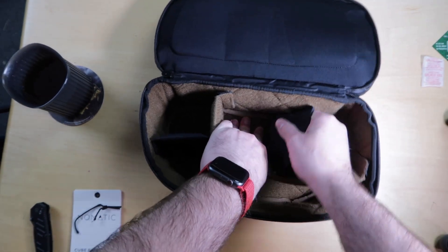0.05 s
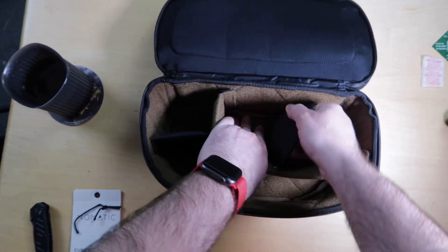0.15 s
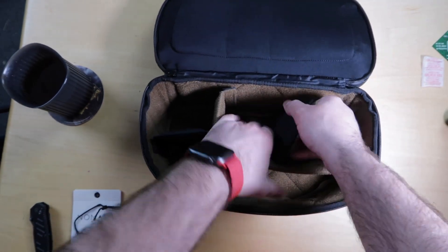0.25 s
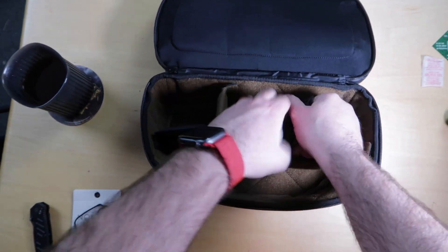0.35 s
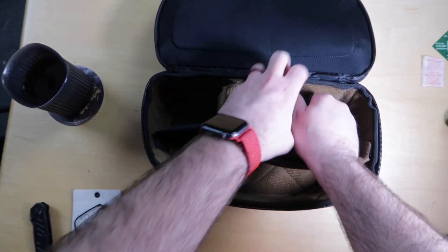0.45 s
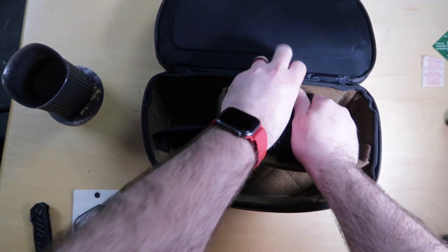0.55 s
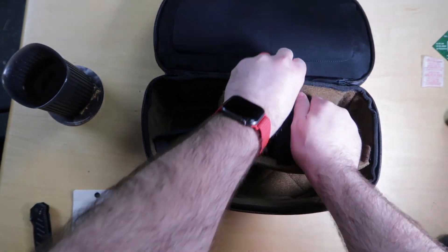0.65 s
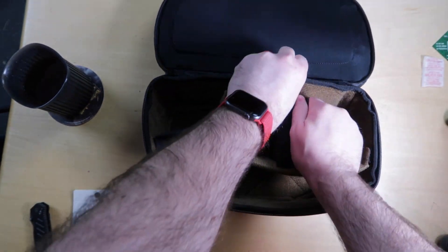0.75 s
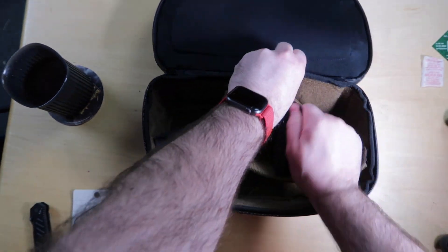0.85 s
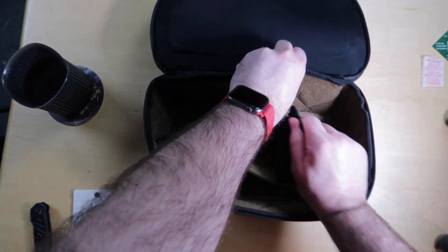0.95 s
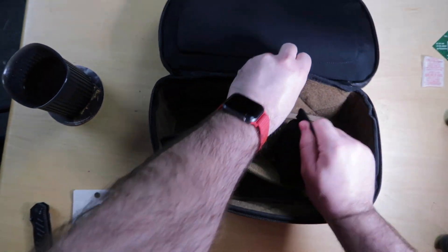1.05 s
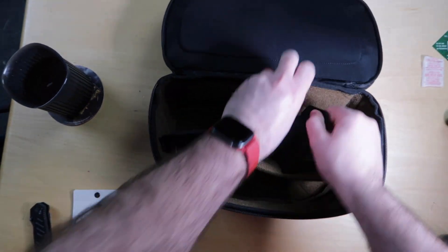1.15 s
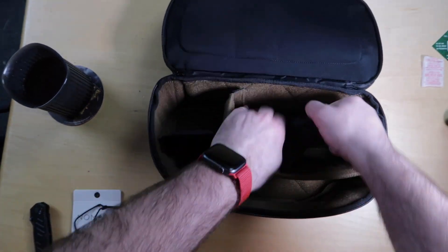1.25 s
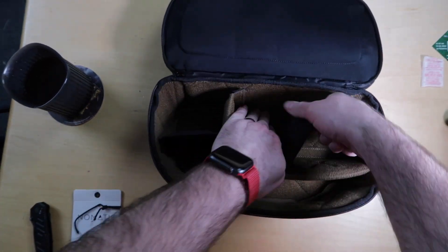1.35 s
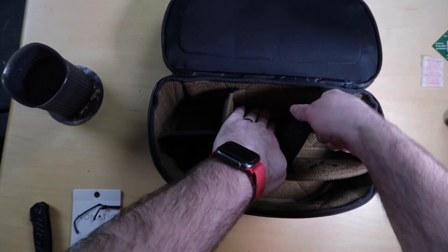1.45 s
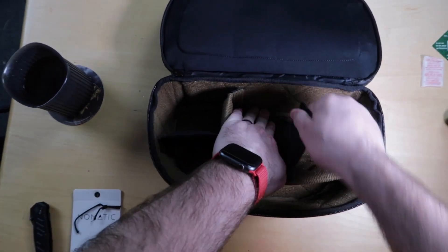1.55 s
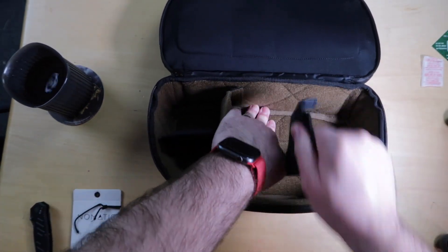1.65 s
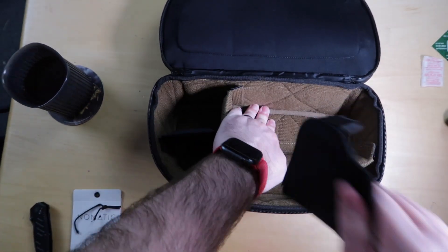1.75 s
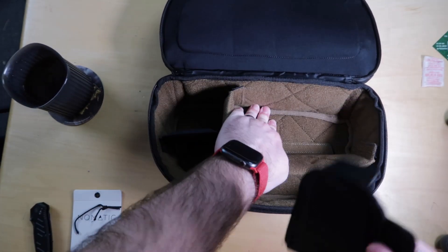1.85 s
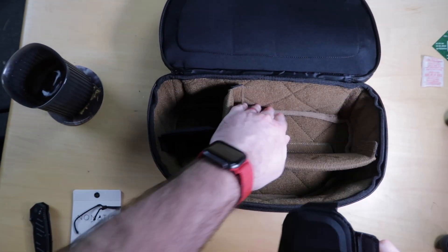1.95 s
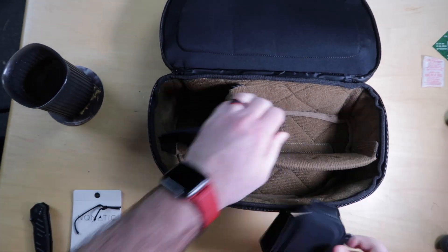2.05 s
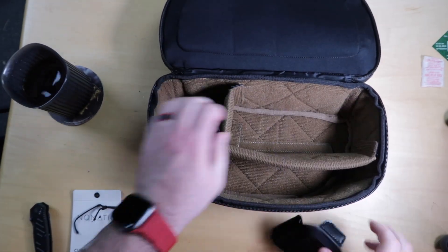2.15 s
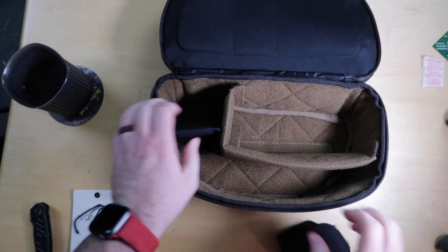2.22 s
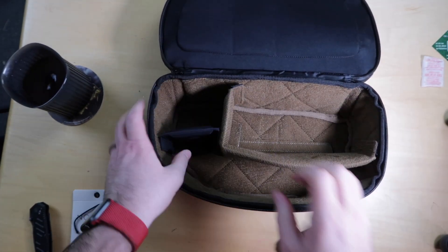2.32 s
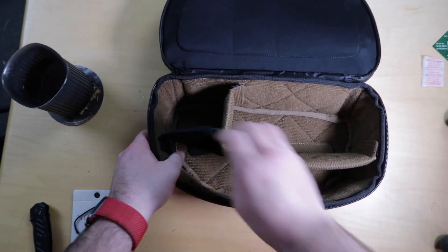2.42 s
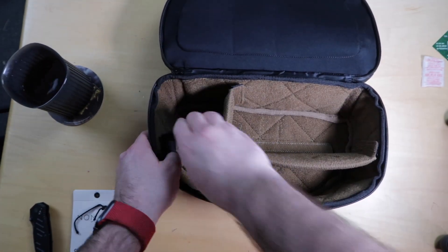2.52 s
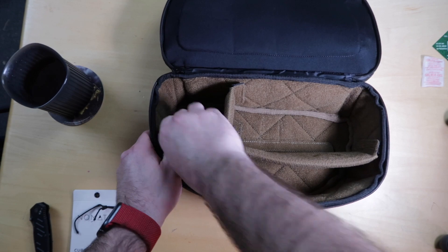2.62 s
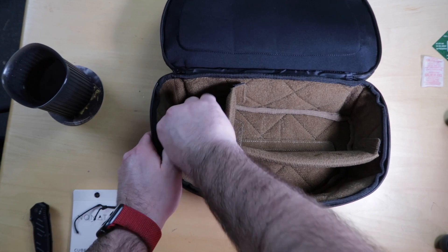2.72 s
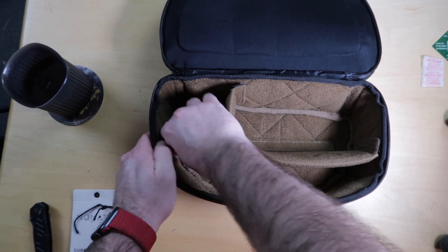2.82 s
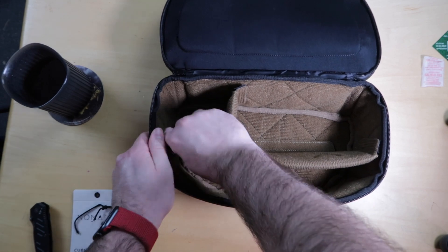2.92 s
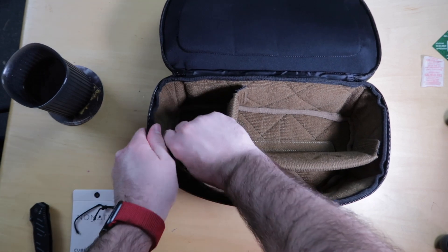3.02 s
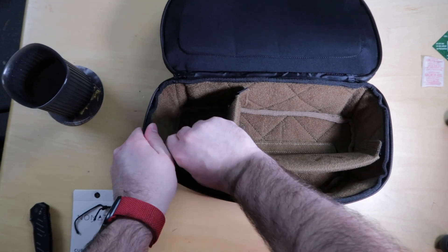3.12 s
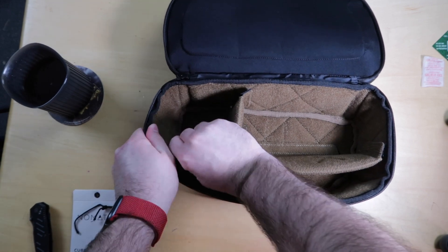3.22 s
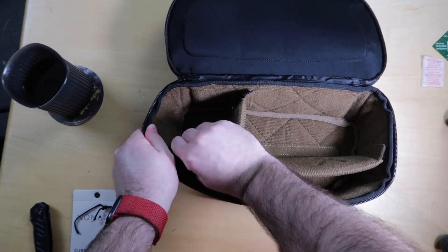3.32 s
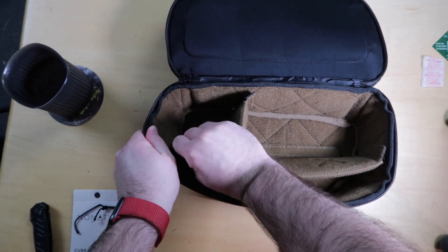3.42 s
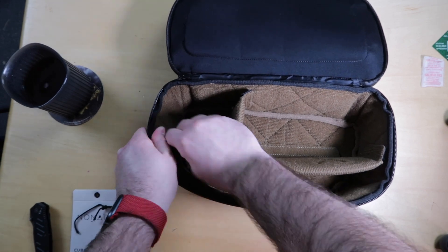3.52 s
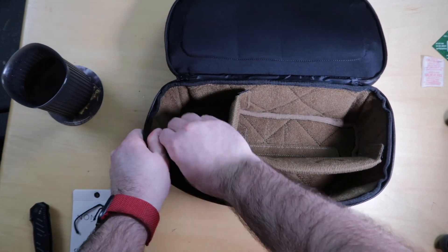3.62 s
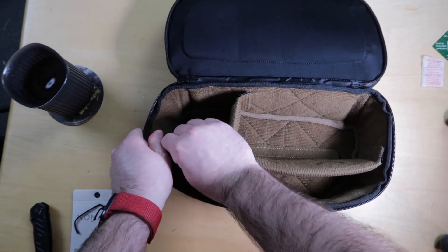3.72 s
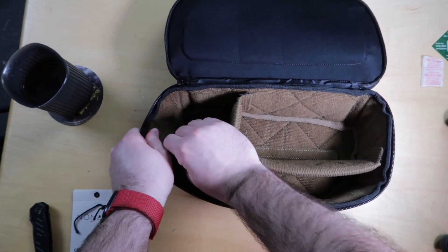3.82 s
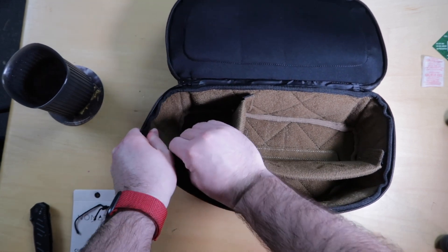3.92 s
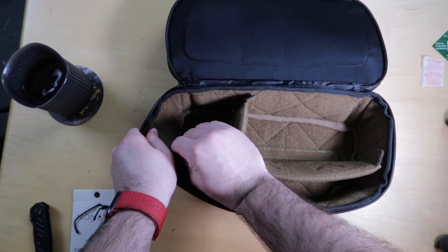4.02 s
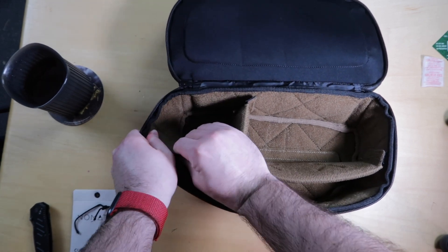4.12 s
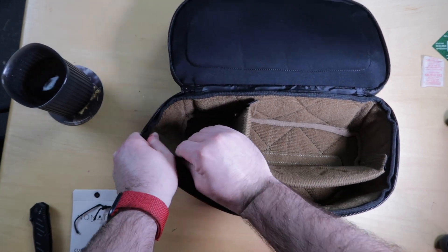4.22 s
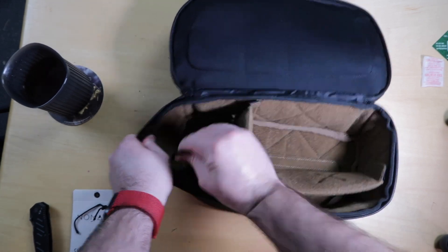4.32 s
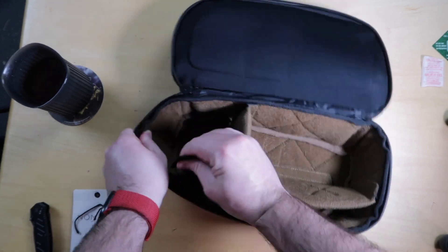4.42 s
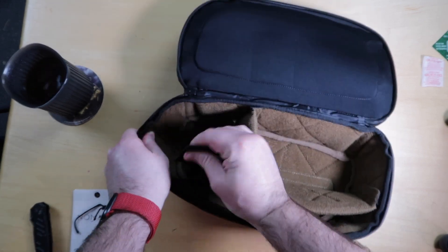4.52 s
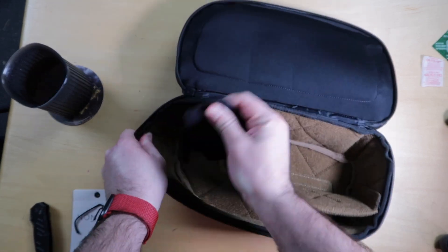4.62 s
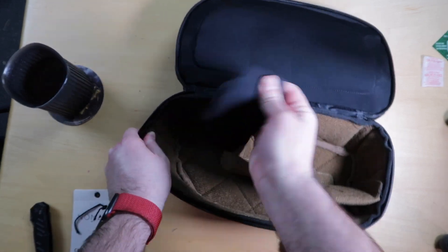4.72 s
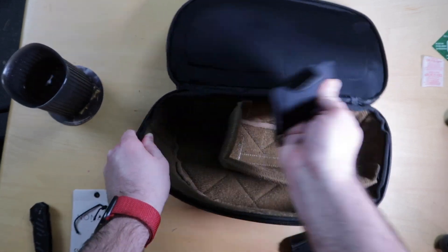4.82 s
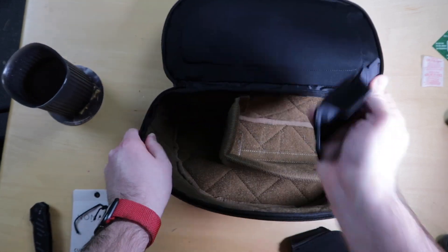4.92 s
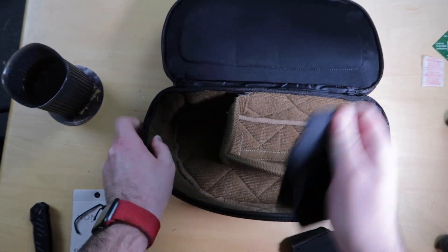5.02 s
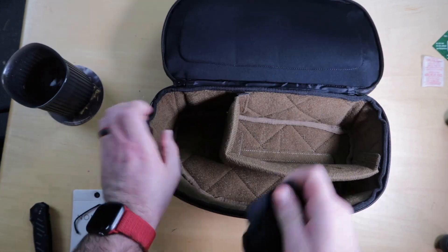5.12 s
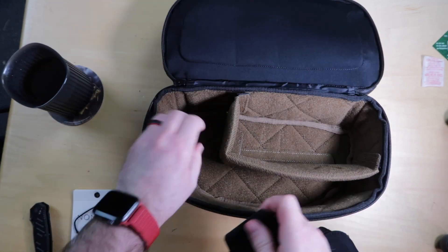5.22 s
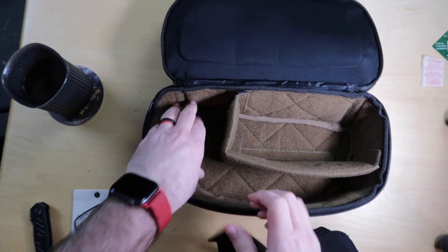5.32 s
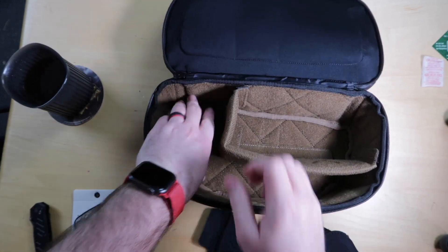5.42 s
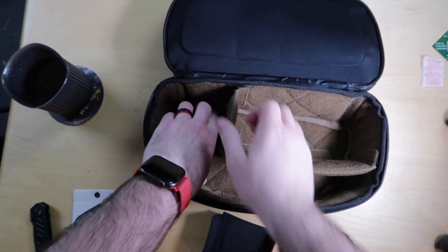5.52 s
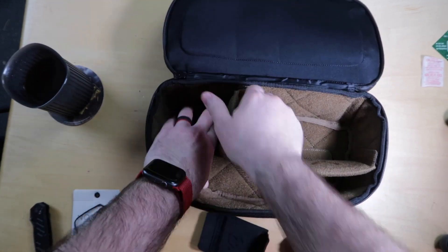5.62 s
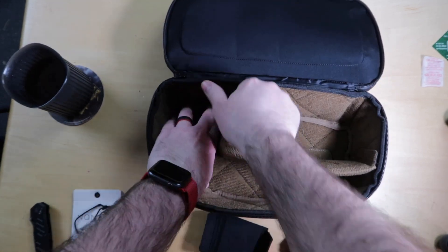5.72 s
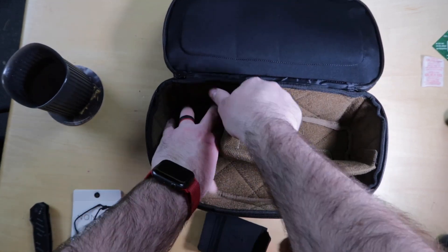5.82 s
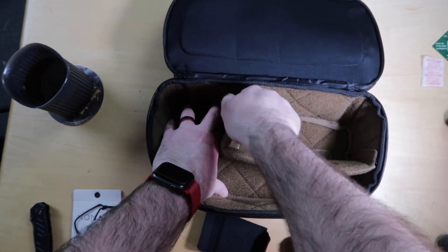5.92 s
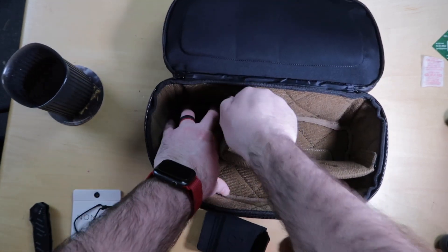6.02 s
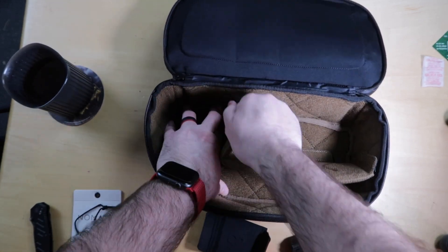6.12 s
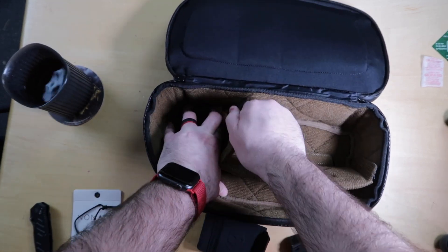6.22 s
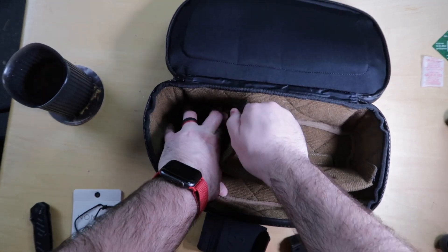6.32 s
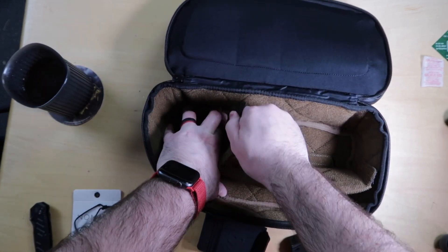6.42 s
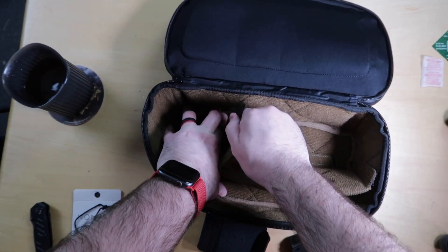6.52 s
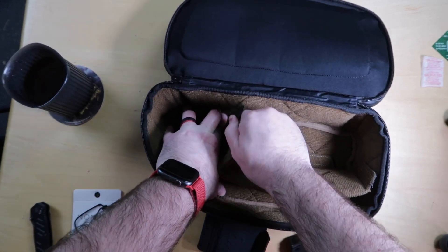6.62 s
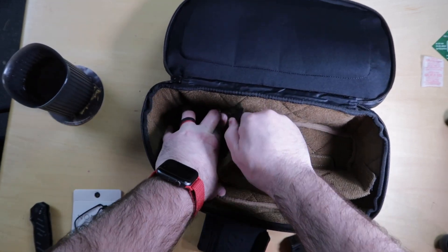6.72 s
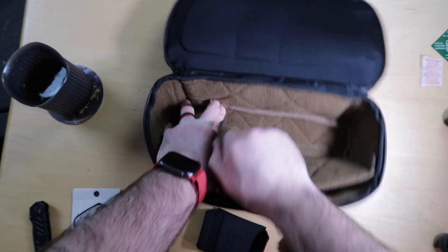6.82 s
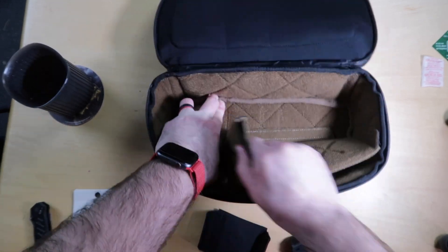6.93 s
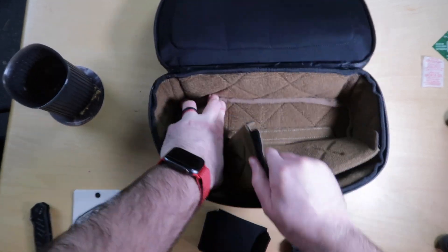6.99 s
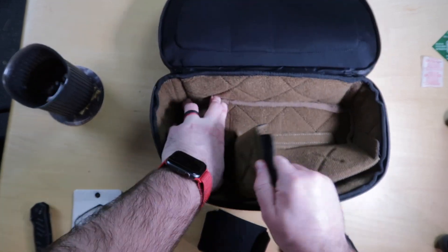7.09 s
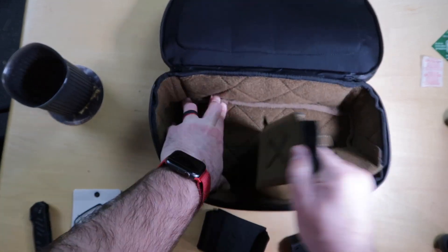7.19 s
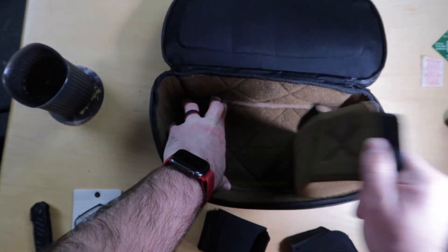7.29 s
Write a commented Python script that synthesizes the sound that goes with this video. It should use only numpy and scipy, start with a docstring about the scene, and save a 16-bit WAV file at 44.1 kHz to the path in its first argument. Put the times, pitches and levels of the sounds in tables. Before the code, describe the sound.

Recorded close at a desk in a furnished room, with a short soft tail and faint steady hiss. From 0 to 0.8 s, fingers rustle on cloth with small taps. A crackling hook-and-loop rip runs from 0.85 to 1.2 s, then a stronger tear at 1.7 to 1.9 s with a thump and a low puff of moving air. Padded knocks and scuffs come at 2.3 to 2.6 s, then quiet rustling. Short rips come at 3.2 to 3.6 s; from 4 to 5 s a sticking peel grows from ticks to thicker tearing, with a loud slap at 4.75 s. Soft bumps and cloth follow around 5.5 to 5.7 s. Sparse crackles from 6.1 s thicken into stuttering rips, bursting at 7 s in the loudest snap and knock, with a brief rustle and a final bright rip from 7.2 s to the end.

```python
"""Tearing padded dividers out of a bag

Padded dividers come out of a bag on a desk in a furnished room, close under a small microphone.
Their nylon hooks snap free one by one or in dense runs: clicks that ring bag, panel, strip and hooks.
Cloth rustles between the rips as dense soft grains; hands and dividers knock the desk, noise bursts
with damped modes under them. Arms push slow air at the capsule and make the desk shudder.
A short diffuse room tail and steady hiss lie behind it all."""
import sys
import numpy as np
from scipy import signal
from scipy.fft import rfft, irfft, next_fast_len
from scipy.io import wavfile
from scipy.ndimage import uniform_filter1d

SR = 44100
rng = np.random.default_rng(int(sys.argv[2]) if len(sys.argv) > 2 else 0)


def int16_out(signal):
    """Quantize to a 16-bit WAV file."""
    q = np.round(np.clip(np.atleast_2d(signal).T, -1, 1) * 32767)
    wavfile.write(sys.argv[1], SR, q.astype(np.int16))


N = 324399
T = np.arange(N) / SR


def undb(db):
    """dB to gain."""
    return 10 ** (np.asarray(db, float) / 20)


def unit(x):
    """Scale to rms 1."""
    return x / np.sqrt(np.mean(x ** 2))


def curves(tables):
    """A gate that opens over the span of each table, and the columns drawn as lines over time."""
    time_s, *columns = np.vstack(tables).T
    is_open = sum((T >= rows[0][0]) * (T < rows[-1][0]) for rows in tables)
    gate = uniform_filter1d(1. * is_open, size=200)
    return gate, [np.interp(T, time_s, column) for column in columns]


def band(x, lo_hz, hi_hz):
    """Band-pass."""
    edges_hz = [lo_hz, min(hi_hz, .45 * SR)]
    return signal.sosfilt(signal.butter(2, edges_hz, "band", fs=SR, output="sos"), x)


def walk(rate):
    """Random levels drawn `rate` times a second, joined by straight slews; spread near 1.3."""
    hold = int(SR / rate)
    steps = np.repeat(rng.standard_normal(N // hold + 1), hold)
    return 1.59 * uniform_filter1d(steps, hold)[:N]


def rips():
    """Hooks let go in uneven runs: the peel sticks and slips; a faster peel is louder and denser."""
    gate, level_db, bag_db, panel_db, hook_db = peel()
    rate = np.clip(2500 * undb(.7 * (level_db + 40)), 200, SR / 4)  # hooks per second
    slip_db = 2.0 * walk(90) + 0.84 * walk(300) - 5.0
    hook_db = hook_db + 0.11 * (level_db + 39.5)  # a slow peel is duller
    shares_db = np.array([bag_db, panel_db, 0 * level_db, hook_db])
    return clicks(rate, 2.2, 4.54) * gate * undb(level_db + slip_db + shares_db)


def peel():
    """Gate, level and the bag, panel and hook shares of the rips, as the hand peels harder or softer."""
    # one list of rows a tug, shares relative to the strip: time_s, level_db, bag_share_db
    tugs = [
        [(0.84, -69, 1), (0.852, -57, -13), (0.858, -64.5, -5), (0.96, -43, -2.5), (1.052, -36, 2.5),
         (1.07, -46, 15), (1.08, -45.5, -7)],
        [(1.08, -44, -1), (1.086, -36.5, -2.5), (1.146, -40, -17), (1.194, -51.5, -3), (1.204, -48, -15),
         (1.214, -56, -4), (1.24, -64, -16)],
        [(1.655, -77, -4), (1.683, -50, 0), (1.735, -47, -4), (1.749, -36.5, -6), (1.837, -27.5, -1.5),
         (1.881, -27.5, -12), (1.94, -59, -4)],
        [(3.16, -65, 2), (3.17, -57, -11), (3.31, -35, -8.5), (3.368, -56.5, -9), (3.372, -49, -10),
         (3.438, -42.5, -8), (3.475, -64.5, -9)],
        [(3.475, -65, -12), (3.497, -39, -15), (3.523, -41.5, -16), (3.541, -36.5, -16), (3.565, -47, -13),
         (3.581, -43, -13), (3.63, -67.5, -11)],
        [(3.96, -72, 11), (4.01, -51, -7), (4.066, -44.5, -5), (4.144, -47, -9), (4.258, -56.5, -4.5),
         (4.28, -46, -6), (4.3, -62, -11)],
        [(4.3, -57, -5), (4.306, -61, 1), (4.316, -40, -13), (4.324, -48.5, -7.5), (4.532, -37, -1),
         (4.568, -34.5, -7.5), (4.67, -65, -2)],
        [(4.67, -58, -7), (4.698, -36, -9), (4.764, -38, 2), (4.918, -39, -13), (4.96, -45, -3),
         (4.968, -34.5, -10.5), (5.01, -63.5, 10)],
        [(6.12, -71, 0), (6.134, -50, -2), (6.144, -66, -2), (6.22, -47.5, -3), (6.298, -52.5, -10),
         (6.31, -42.5, -8), (6.37, -59, -11)],
        [(6.37, -55, -7), (6.384, -40.5, -1), (6.408, -46.5, -5), (6.418, -43, 0), (6.468, -46.5, -8),
         (6.478, -36, 1), (6.57, -54, -4.5)],
        [(6.57, -50.5, -12), (6.59, -41, -1), (6.614, -51, -13), (6.632, -42.5, 2), (6.754, -56, -4),
         (6.79, -74, 1)],
        [(6.79, -84, 14), (6.798, -54.5, -2), (6.822, -42, -11), (6.84, -43, 5), (6.868, -53, 0),
         (6.876, -46.5, -3), (6.92, -43.5, -1.5)],
        [(6.92, -45.5, 2), (6.934, -35.5, -1), (6.976, -35, 5), (6.992, -23, -1), (7.026, -36, 3),
         (7.034, -29, -6), (7.08, -45.5, -4)],
        [(7.16, -62, 1), (7.182, -62, 5), (7.192, -52.5, -11), (7.254, -43, 1.5), (7.274, -28.5, -13),
         (7.282, -35.5, -4.5), (7.356, -31, 6)],
    ]
    # the strip sits differently at each tug: panel_share_db (before the bag's part), hook_share_db
    tug_colour = [(4.5, -4), (2, -8), (-1, -6), (-7, -14), (-4.5, -17), (-2, -8), (1.5, -10), (0.5, -9.5),
                  (-6.5, -8), (-5, -7), (-7, -9), (-1.5, -8.5), (-2.5, -10.5), (-2, -4)]
    rows = [np.c_[tug, np.tile(colour, (len(tug), 1))] for tug, colour in zip(tugs, tug_colour)]
    gate, (level_db, bag_db, panel_db, hook_db) = curves(rows)
    return gate, level_db, bag_db, panel_db + 0.35 * bag_db, hook_db  # the panel partly follows the bag


def snaps():
    """One or a few hooks tear within a millisecond and drag neighbours loose after them.

    Besides the loud ones, small snaps fall at random through the rips, clearest in a slow peel."""
    # loudest snaps, a few hooks at once, levels relative: time_s, strip_db, bag_share_db, hook_share_db
    loud = [(0.8502, -39, -7, -1), (0.878, -33.5, -4.5, -3), (0.908, -33, -1, -3), (0.9225, -30.5, -8, -1),
            (0.9384, -29.5, -1, -4), (0.9667, -27, -13, -15), (1.0066, -22, -5.5, -14), (1.04, -27, 8.5, 1),
            (1.0574, -28, -2.5, -4), (1.0914, -20, -25, -21), (1.1175, -23, -21, -24),
            (1.141, -24, -28, -16), (1.203, -33, -30, -17), (1.6778, -45, -2, -4), (1.7003, -31, -6, -12),
            (1.7483, -21, -12, -16), (1.7533, -17.5, -14, -19), (1.7729, -17.5, -13, -18),
            (1.789, -25, -11, -13), (1.814, -14, -15, -15), (1.872, -14, -18, -1.5),
            (3.175, -36.5, -24, -7), (3.2652, -22.5, -20, -23), (3.2802, -31, -3, -19),
            (3.3104, -36, -24, -20), (3.3747, -29, -11, -14), (3.4044, -32, -14, -15),
            (3.4217, -29.5, -34, -24), (3.483, -35, -21, -15), (3.4947, -28, -24, -23),
            (3.5382, -24.5, -14, -22), (3.5764, -31, -22, -15), (3.913, -42, -4, -8), (3.997, -39, -9, -5),
            (4.0123, -29.5, -17, -13), (4.0313, -31, -27, -4.5), (4.0761, -28, -14.5, -9),
            (4.0844, -32, -20, -2), (4.1058, -28, -15, -2), (4.146, -32, -23, -19), (4.163, -27, -7, -17),
            (4.196, -39, -16, -5), (4.202, -31, -23, 2.5), (4.2314, -33, -18, -9), (4.2444, -37, -13, -4),
            (4.2638, -31, -1.5, 0.5), (4.3154, -27.5, -14, -4), (4.3354, -32, -19, -5),
            (4.3461, -29.5, -7, 0), (4.3713, -36, -15, -4), (4.3804, -37, -19, 10), (4.3898, -29.5, -6, -3),
            (4.4068, -27.5, -2, -13), (4.4111, -30, -2, 5.5), (4.4242, -27, -4, -7),
            (4.4631, -22.5, -11, -5), (4.511, -22.5, 10.5, -18), (4.5686, -23.5, 2, -23),
            (4.698, -24, -19, -16), (4.727, -27.5, 1, -10), (4.7464, -20.5, 1, -6), (4.8107, -21.5, 1, -8),
            (4.9665, -27, -23, -24), (6.0771, -52, -13, -12), (6.097, -49, -8, -4), (6.131, -39, -13, -7),
            (6.1708, -38, -12, 0), (6.1995, -40, -17, 3), (6.2149, -34, -7, -8), (6.2463, -34, -10, -17),
            (6.2856, -39, -24, -16), (6.3104, -31.5, -8, -19), (6.3589, -35, -13, -12),
            (6.3816, -24.5, -6, -18), (6.3958, -30, -9, -14), (6.4213, -29, -18, -9),
            (6.4428, -27.5, -16, -7), (6.4773, -25, 0.5, -18), (6.4921, -25, -16, -19),
            (6.5104, -28.5, -12, -18), (6.5425, -31.5, -19, -9), (6.5865, -26, -5.5, -17),
            (6.621, -34, -5, -18), (6.634, -26, -6, -30), (6.6646, -31, -9, -18), (6.675, -26, -4, -13),
            (6.6975, -31.5, -2, -21), (6.7331, -35, -2, -21), (6.8004, -35, -13, -13),
            (6.8183, -29, -10, -21), (6.8368, -28.5, 2.5, -18), (6.8795, -26.5, 0, -12),
            (6.9327, -21.5, -11, -21), (6.9454, -24, 1, -15), (6.9811, -19.5, 15, -20),
            (6.991, -11.5, -4, -25), (7.0044, -15, -16, -20), (7.0094, -20, -9, -18), (7.0322, -16, -8, 3),
            (7.0434, -19, -12, -13), (7.1462, -44, -9, -13), (7.195, -30, -20, -8), (7.226, -31, -26, -2),
            (7.242, -25, -16, -7), (7.257, -24, -15, -15), (7.265, -19, -15, -16), (7.2718, -19, -22, -19),
            (7.2974, -19, -4, -4.5), (7.325, -20, -16, -16)]
    gate, rip_db, rip_bag_db, _, rip_hook_db = peel()
    small_per_s, scatter_db, colour_db = 160, 4.5, 6  # scatter of size and of colour
    at = rng.integers(0, N, int(small_per_s * N / SR))
    size, low, high = rng.standard_normal((len(at), 3)).T

    # small snaps gain on the rip as it falls under -43 dB, and lose above it
    stand_out_db = 3.5 + 0.14 * (-43 - rip_db[at])
    small_db = rip_db[at] + stand_out_db + scatter_db * size
    small_bag_db = rip_bag_db[at] + colour_db * low
    small_hook_db = rip_hook_db[at] + 3 + colour_db * high  # brighter than the run around them
    small = np.array([T[at], small_db, small_bag_db, small_hook_db])
    small = small[:, gate[at] > .5]
    time_s, strip_db, bag_db, hook_db = np.hstack([np.transpose(loud), small])

    # (share dB, decay s) of bag, panel, strip and hooks; the panel lies between bag and strip
    parts = [(bag_db + 10.5, 0.00044), (bag_db / 2 + 9.0, 0.00072), (9.5, 0.0011), (hook_db + 8, 0.0003)]
    # the dragged neighbours: 4 dB under a loud snap, 8 dB under a small one
    follow_db, follow_s = np.where(np.arange(len(time_s)) < len(loud), -4, -8), 0.0056
    forces = []
    for share_db, decay_s in parts:
        tear = bursts(time_s, strip_db + share_db, decay_s)
        neighbours = bursts(time_s, strip_db + share_db + follow_db, follow_s)
        forces.append(tear + neighbours)
    return np.array(forces)


def rustle():
    """Cloth on cloth and skin: very dense soft grains, swelling as the fingers move."""
    # one row a movement, levels relative: peak_s, level_db, swell_s, fade_s, bag_share_db, hook_share_db
    movements = [(0.0, -58, .05, 0.12, -5.5, -11), (.275, -58, 0.05, 0.13, 1.5, -4.5),
                 (.56, -63.5, 0.33, 0.055, 1, -11), (.664, -66.5, 0.067, 0.064, 9.5, -4),
                 (.8, -66.5, 0.11, 0.12, 2.5, -6), (1.294, -57, 0.049, 0.055, 4, -5.5),
                 (1.44, -58.5, 0.1, 0.13, 5, -7.5), (1.6, -68, 0.17, 0.18, -7.5, -14),
                 (1.95, -59, .02, 0.03, -11, -9), (2.134, -63, 0.12, .1, -15, -4),
                 (2.6, -54.5, 0.021, 0.039, 1, -14), (2.712, -67.5, .008, 0.11, 2, -1),
                 (2.778, -67, 0.11, 0.23, 0.5, -4), (2.917, -62.5, 0.015, 0.091, 13, -6),
                 (3.086, -63.5, .3, 0.2, -3, -13), (3.724, -62.5, 0.056, 0.27, 0, -12),
                 (5.02, -63, .03, 0.3, -9, -8), (5.275, -68.5, .015, 0.017, -7, -16),
                 (5.519, -67, 0.089, 0.45, 3.5, -12), (5.654, -53.5, 0.021, 0.033, 6.5, -14),
                 (5.814, -64.5, 0.032, 0.025, 8, -10.5), (5.9, -89, .02, 0.12, -8, -16),
                 (6.03, -66, .15, 0.22, 2, -6.5), (7.085, -53, .02, 0.087, -1, -16),
                 (7.15, -75.5, 0.017, .06, 0, -12)]
    peak_s, level_db, swell_s, fade_s, bag_db, hook_db = np.transpose(movements)[:, :, None]
    t = T[::64]  # a coarse clock is enough for slow swells
    from_peak = np.maximum((peak_s - t) / abs(swell_s), (t - peak_s) / abs(fade_s))
    power = undb(level_db - 15 * from_peak) ** 2 + 1e-30  # 15 dB over each swell or fade
    total = power.sum(0)
    gain = np.interp(T, t, np.sqrt(total))
    # where movements overlap, the stronger one weighs more in the colour
    bag_db, hook_db = (np.interp(T, t, (power * share).sum(0) / total) for share in (bag_db, hook_db))
    shares_db = np.array([bag_db, bag_db / 2 - 2.5, 0 * T, hook_db])  # the panel follows the bag half way
    return clicks(6000., 2.4, 5.6) * gain * undb(1.4 * walk(60) + shares_db)


def clicks(rate, spread_db, colour_db):
    """Random clicks, rms near 1, felt by bag, panel, strip and hooks; each shares its force differently."""
    on = rng.random(N) < rate / SR
    # click sizes are capped, so no single click leaps out of the run
    size_db = spread_db * np.minimum(rng.exponential(size=N), 3)
    sign = np.sign(rng.standard_normal(N))
    out = on * sign * undb(size_db + colour_db * rng.standard_normal((4, N)))
    return out * np.sqrt(SR / rate / np.mean(out[:, on] ** 2, axis=1, keepdims=True))


def bursts(times, db, decay_s):
    """A sharp front and a short noisy decay at each time; db sets the energy, decay held to 0.1-20 ms."""
    decay_s = np.clip(np.reshape(decay_s, (-1, 1)), 1e-4, .02)
    t = np.arange(int(6 * decay_s.max() * SR)) / SR
    shape = rng.standard_normal((len(times), len(t))) * np.exp(-t / decay_s)
    shape /= np.sqrt(np.sum(shape ** 2, axis=1, keepdims=True))
    out = np.zeros(N + len(t))
    starts = (times * SR).astype(int)[:, None]
    np.add.at(out, starts + np.arange(len(t)), shape * undb(db)[:, None])
    return out[:N]


def fabric(force):
    """The four forces ring the bag, the divider panel, the fastener strip and the hooks."""
    # resonances of each body, levels relative within it: centre_hz, width_hz, level_db
    bag_peaks = [(331, 130, -2.5), (506, 104, 2.5), (631, 104, 3), (799.5, 35, 0)]
    panel_peaks = [(970, 272, 2.5), (1385, 413, 7), (1550, 504, 6), (2203, 210, -6.5)]
    strip_peaks = [(2345, 485, 2), (3200, 570, 5.5), (3945, 770, 4.5), (5910, 2200, -3)]
    hook_peaks = [(7200, 167, 8), (8500, 1500, 3), (10950, 2020, 6), (13600, 6000, -1.5)]
    bodies = (bag_peaks, panel_peaks, strip_peaks, hook_peaks)
    return sum(resonate(f, body) for f, body in zip(force, bodies))


def resonate(x, peaks):
    """Two-pole resonances side by side, alternating in sign; white noise keeps its rms."""
    size = next_fast_len(N)
    jf = 1j * np.fft.rfftfreq(size, 1 / SR)
    response = 0
    for k, (hz, width, db) in enumerate(peaks):
        response = response + (-1) ** k * undb(db) * width * jf / (jf ** 2 + width * jf + hz ** 2)
    response = response / np.sqrt(np.mean(abs(response) ** 2))
    return irfft(rfft(x, size) * response, size)[:N]


def knocks():
    """Each blow ticks, slaps, thuds in the padding and sets the desk top booming."""
    # one row a blow, each level relative within its layer:
    # time_s, slap_db, thud_db, deep_db, tick_db, hard_edge_db, slap_decay_s (0.02 at most), slap_hz
    blows = [ (.093, -50, -58, -72, -47, -66, 0.0017, 1780), (.66, -48.5, -61, -78, -46, -64, 0.0016, 1800),
             (5.556, -58, -54, -66, -42.5, -37, .002, 1800), (5.896, -51.5, -55, -61, -58, -70, .004, 1200),
             (0.155, -37, -43, -61, -33.5, -61, 0.0038, 1630), (0.272, -55, -60, -59, -42, -61, .007, 900),
             (.322, -52, -49, -57.5, -62, -65, .005, 520), (0.378, -45, -58, -66, -65, -66, 0.0015, 800),
             (.566, -54, -44.5, -52, -49, -65, 0.0078, 560), (0.674, -48, -47, -70, -44, -45, 0.0022, 1180),
             (1.773, -24, -34.5, -41, -32, -34, 0.0085, 634),
             (2.271, -38.5, -45, -59, -41.5, -46, 0.012, 1040),
             (2.327, -29.5, -30.5, -43.5, -34.5, -27, 0.01, 770),
             (2.39, -36.5, -36, -50, -39.5, -35, 0.006, 900), (2.45, -26, -38, -65, -60, -41, 0.021, 1200),
             (2.479, -45, -43.5, -63, -67, -52, 0.0033, 1170),
             (2.583, -37.5, -36.5, -53, -47.5, -68, 0.0094, 604), (2.6, -46, -39, -59, -53, -73, .008, 604),
             (4.51, -44, -57, -40, -34, -54, 0.0059, 506), (4.635, -33, -48, -38.5, -40, -55, 0.0048, 625),
             (4.755, -17.5, -28, -45.5, -41, -42, 0.0069, 1230),
             (5.534, -31.5, -28.5, -42, -47.5, -47, 0.0077, 865),
             (5.653, -31, -44, -54, -64, -66, 0.015, 1260),
             (6.983, -9.5, -32, -40.5, -34, -38, 0.0041, 555),
             (7.171, -52, -46, -42.5, -53, -52, .005, 595)]
    # deep modes of the desk top, levels relative: mode_hz, level_db, t60_s
    desk_modes = [(92, 7.5, 0.47), (123.7, 16.5, 0.084)]
    # thud modes of the padding, levels relative: mode_hz, level_db, t60_s
    pad_modes = [(191, -5, 0.066), (281, -1, 0.032), (388, 5, 0.016)]
    time_s, slap_db, thud_db, deep_db, tick_db, edge_db, slap_s, slap_hz = np.transpose(blows)

    tick = band(bursts(time_s, tick_db + 22.5, 0.00091), 2430, 5560)
    edge = band(bursts(time_s, edge_db + 10.5, .0007), 7560, 17000)
    slap = np.zeros(N)
    for at, db, decay_s, hz in zip(time_s, slap_db, slap_s, slap_hz):  # each spot struck has its own colour
        i = int(at * SR)
        blow = bursts(np.zeros(1), [db + 26], decay_s)[:5000]
        slap[i:i + 5000] += band(blow, hz / 1.7, hz * 1.7)

    thud_force = abs(bursts(time_s, thud_db - 3, 0.00013))
    thud = signal.fftconvolve(thud_force, -ring(pad_modes))[:N]
    push = np.hanning(90)  # a soft hand presses for a couple of milliseconds
    deep_force = abs(bursts(time_s, deep_db - 34.0, 0.00018))
    deep = signal.fftconvolve(deep_force, np.convolve(push, -ring(desk_modes)))[:N]
    return tick + edge + slap + thud + deep


def ring(modes):
    """Response of damped modes, peak 1."""
    t = np.arange(SR // 3) / SR
    h = sum(undb(db) * np.sin(2 * np.pi * hz * t) * np.exp(-np.log(1000) * t / t60) for hz, db, t60 in modes)
    return h / abs(h).max()


def arms():
    """Moving arms: slow air pressure on the capsule and an uneven low shudder through the desk."""
    # levels of the two noises over time, drawn as lines: time_s, puff_db, shudder_db
    moves = [(0.0, -67, -77), (0.06, -65, -77), (0.65, -66.5, -67), (1.29, -49, -69), (1.76, -38.5, -54),
             (2.01, -52, -73), (2.19, -54, -78), (2.25, -69, -78), (2.48, -49.5, -62), (2.95, -59, -77.5),
             (4.38, -68, -78), (4.79, -60, -47), (5.1, -57, -73.5), (5.43, -86, -86), (5.51, -64, -79.5),
             (5.66, -69, -67), (6.27, -68.5, -72.5), (6.94, -62, -76), (7.05, -39, -59), (7.15, -55, -51),
             (7.36, -49, -50.5)]
    _, (puff_db, shudder_db) = curves([moves])
    puff = unit(band(band(rng.standard_normal(N), 8.2, 29), 8.2, 29))
    shudder = unit(band(rng.standard_normal(N), 61, 137)) * undb(3.9 * walk(38))
    return puff * undb(puff_db) + shudder * undb(shudder_db)


def room(x):
    """Diffuse echoes that build up over 2.4 ms and die faster in the treble."""
    # decay of the furnished room by band, levels relative: band_hz, t60_s, level_db
    decay_bands = [(225, 0.2, -8), (760, 0.14, -5), (1740, 0.11, -5.5), (4840, 0.089, -6.5),
                   (11000, 0.047, -7)]
    t = np.arange(SR // 3) / SR
    tail = 0
    for hz, t60, db in decay_bands:
        part = band(rng.standard_normal(len(t)), hz / 1.37, hz * 2.32)
        part = part * np.exp(-np.log(1000) * t / t60) * np.clip(t / 0.0024, 0, 1)
        tail = tail + undb(db) * part / np.sqrt(np.sum(part ** 2) * SR / 2 / hz)
    return x + signal.fftconvolve(x, tail)[:N]


def hiss():
    """Steady room and microphone noise, shaped in frequency, at -69.5 dB rms."""
    # noise spectrum, levels relative: frequency_hz, density_db
    spectrum = [(24, -31), (40, 1), (155, -12), (556, -12.5), (751, -18), (1950, -13.5), (2320, -19),
                (3060, -18), (16000, -28.5)]
    hz, db = np.transpose(spectrum)
    f = np.fft.rfftfreq(N, 1 / SR)
    shape = undb(np.interp(np.log(f + 1), np.log(hz), db))
    return undb(-69.5) * unit(irfft(rfft(rng.standard_normal(N)) * shape, N))


def scene():
    """Close sounds through the room, plus what reaches the capsule directly."""
    cloth = fabric(rips() + snaps() + rustle())
    return (room(cloth + knocks()) + arms() + hiss())[None]


def record(dry):
    """The recorder cuts the top steeply above 15.8 kHz."""
    return signal.sosfilt(signal.ellip(10, .2, 70, 15800, fs=SR, output="sos"), dry)


dry = scene()
out = record(dry)
int16_out(out)
```